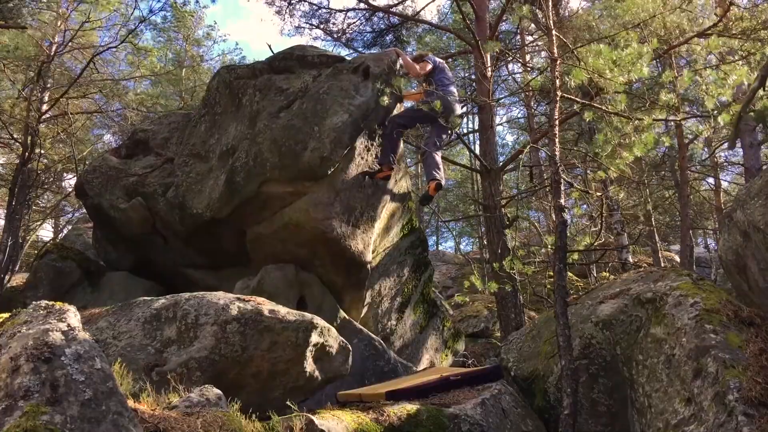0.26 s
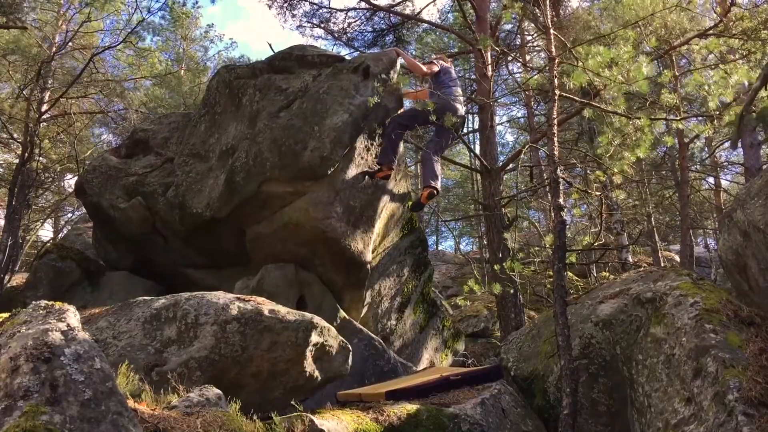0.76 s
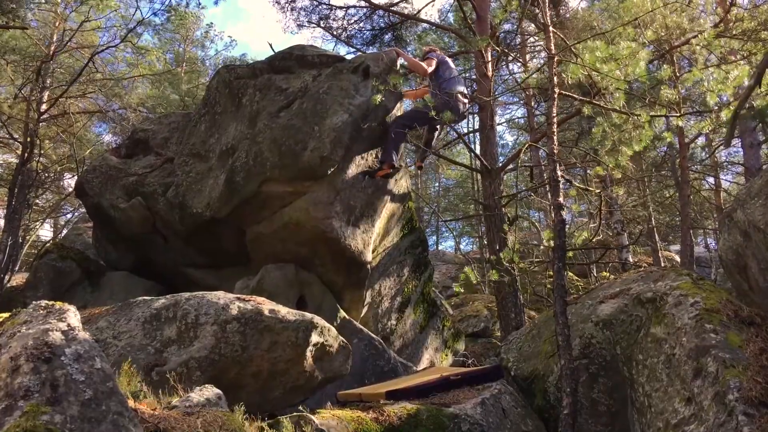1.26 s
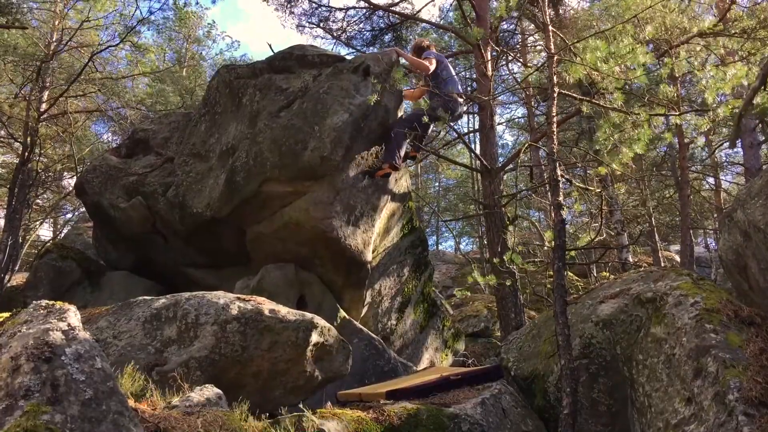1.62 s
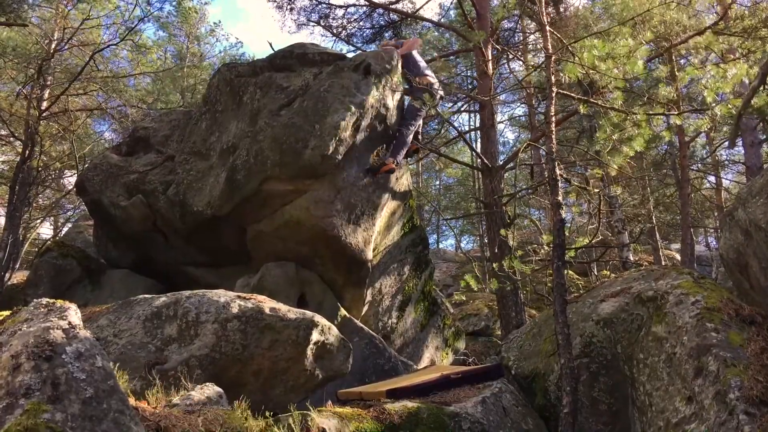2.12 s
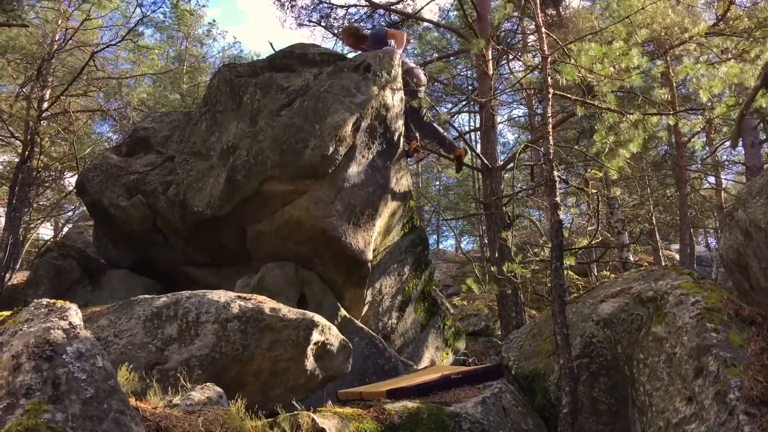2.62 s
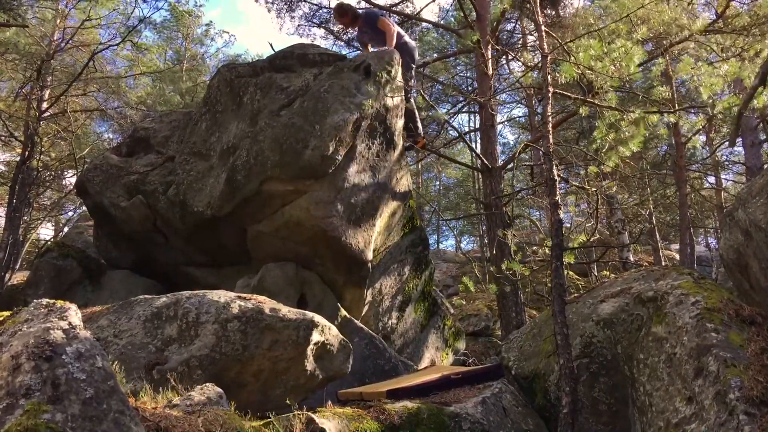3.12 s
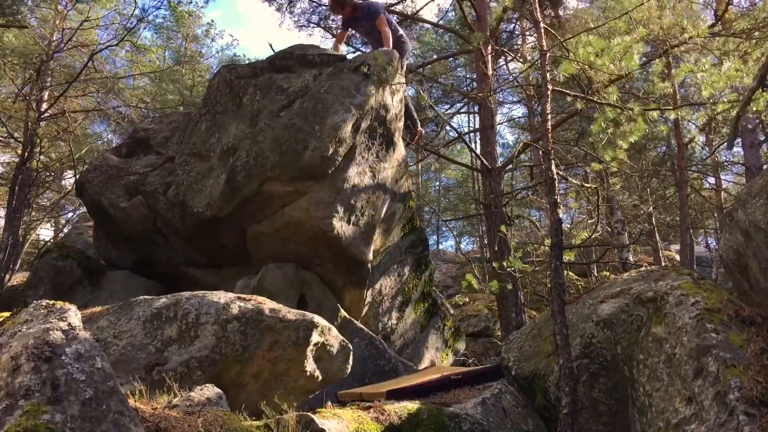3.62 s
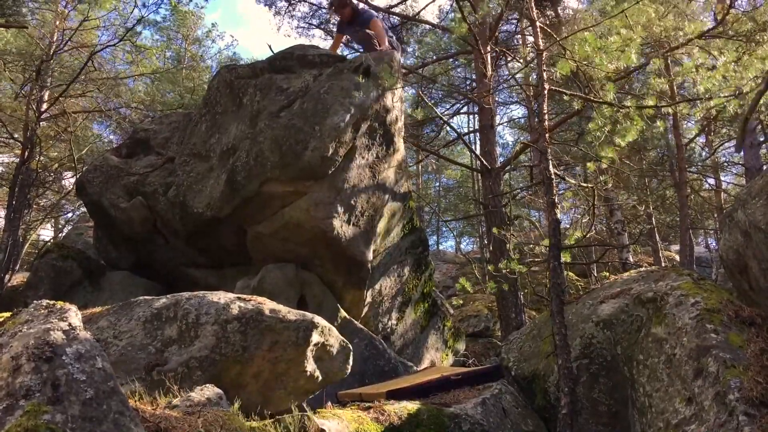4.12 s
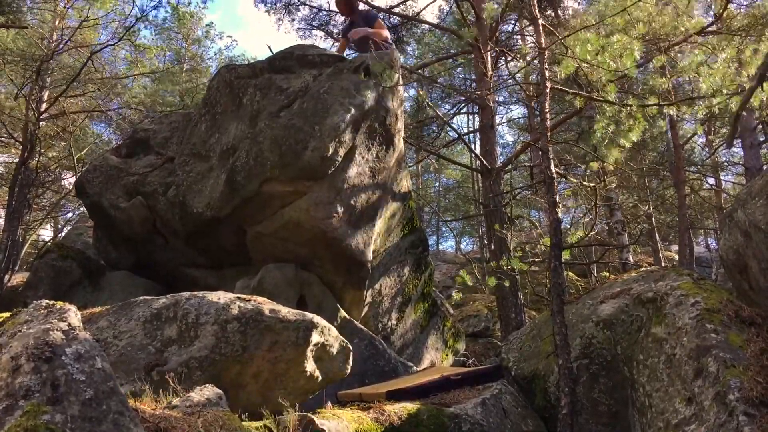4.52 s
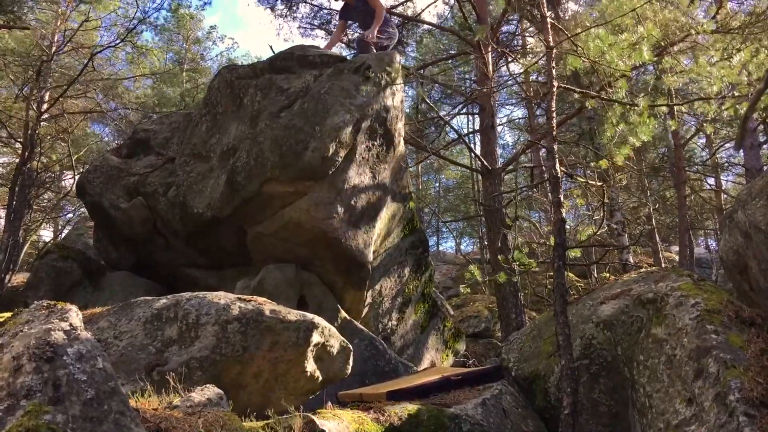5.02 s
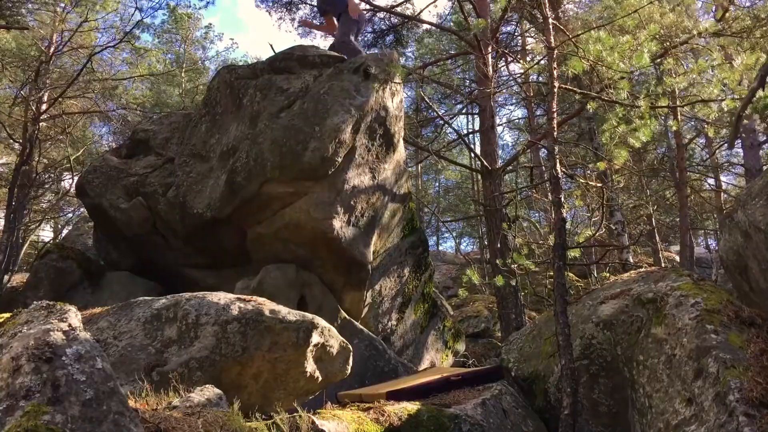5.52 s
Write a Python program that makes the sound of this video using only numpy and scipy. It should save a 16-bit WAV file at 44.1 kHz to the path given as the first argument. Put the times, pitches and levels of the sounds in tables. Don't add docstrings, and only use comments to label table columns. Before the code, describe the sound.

Wind strikes a bare microphone in a pine forest. Small scattered flutters and soft thuds come first, with a short lull, then from about two seconds the buffets grow dense and hard, easing near the end. Beneath lies a quiet, steady hiss of needles. The climber on the boulder is almost inaudible, only tiny gritty ticks and scuffs.

```python
import sys
import numpy as np
from scipy import signal
from scipy.io import wavfile
from scipy.ndimage import uniform_filter1d

SR = 44100
rng = np.random.default_rng(int(sys.argv[2]) if len(sys.argv) > 2 else 0)


def persist_wave(psi):
    counts = np.round(np.clip(psi, -1, 1) * 32767).astype(np.int16)
    wavfile.write(sys.argv[1], SR, np.atleast_2d(counts).T)


def gain_from_decibels(decibels):
    exponent = np.asarray(decibels, float) / 20
    return 10 ** exponent


N = 254016
TIME = np.arange(N) / SR
CALM_SWING_DB, CALM_SMALL_DB = -32.5, -48
MAX_PASSING_MS = 3.5


def level(x, rms_db):
    return x * gain_from_decibels(rms_db) / np.sqrt(np.mean(x ** 2))


def band(x, lo_hz, hi_hz, order=2):
    sos = signal.butter(order, [lo_hz, hi_hz], "bandpass", fs=SR, output="sos")
    return signal.sosfilt(sos, x)


def walk(rate_hz):
    k = int(SR / rate_hz)
    held = np.repeat(rng.standard_normal(1200), k)[:N]
    return 1.27 * uniform_filter1d(uniform_filter1d(held, k), k)


def add(out, start_s, grain):
    i = max(int(start_s * SR), 0)
    out[i:i + len(grain)] += grain[:N - i]


def swirl(t, width_s):
    return t / width_s * np.exp(.5 - (t / width_s) ** 2 / 2)


# start_s, length_s, small_turbulence_db, swings_over_small_db
GUST_TABLE = [(0.27, 0.021, -38, 6), (0.365, 0.051, -30, 3), (0.48, 0.027, -27, -3),
              (0.584, 0.13, -27, 1.5), (0.948, 0.047, -33, 6), (1.018, 0.098, -31, -9),
              (1.138, 0.033, -36, -15), (1.21, 0.21, -29, -7), (1.815, 0.032, -32, -9),
              (1.919, 0.17, -24, -10), (2.137, 0.28, -24.5, -3), (2.508, 0.25, -24, 6),
              (2.813, 0.077, -25, -10.5), (2.958, 0.018, -23, -2), (3.013, 0.23, -23, 5),
              (3.303, 0.2, -21.5, -8), (3.641, 0.24, -20.5, 3), (3.96, 0.089, -26, 4.5),
              (4.173, 0.052, -28, 8.5), (4.342, 0.092, -23, 1), (4.538, 0.15, -19, -18),
              (4.86, 0.093, -18.5, -0.5), (5.01, 0.05, -21.5, -3), (5.158, 0.094, -34, 6),
              (5.306, 0.038, -21.5, 2), (5.387, 0.17, -35, -2), (5.645, 0.02, -30, -22),
              (5.72, 0.034, -37.5, 17)]
# centre_s, half_length_s, drop_db
STALLS = [(0.14, 0.083, -2), (0.746, 0.015, -12), (0.84, 0.02, -12), (0.92, 0.011, -12),
          (1.462, 0.011, -14), (1.668, 0.023, -10), (1.793, 0.012, -4), (2.12, 0.021, -4.5),
          (2.28, 0.0097, -4), (2.48, 0.02, -4.5), (3.001, 0.0075, -20), (3.247, 0.019, -7),
          (3.57, 0.035, -9), (3.723, .015, -3), (4.14, 0.016, -8), (4.23, 0.012, -4), (4.313, 0.033, -1.5),
          (4.436, 0.017, -17), (4.755, 0.036, -4.5), (5.103, 0.031, -12), (5.29, 0.018, 0),
          (5.52, 0.0078, -12), (5.615, 0.026, -12)]


def flow(calm_db, gust_db, edge_stretch):
    rise_s, fall_s = 0.0072, 0.027
    steps = np.arange(0, N / SR, .002)
    start, length = np.transpose(GUST_TABLE)[:2, :, None]
    rise = np.minimum((steps - start) / rise_s, 0)
    fall = np.minimum((start + length - steps) / fall_s, 0)
    gusts = np.exp(-(rise ** 2 + fall ** 2) / edge_stretch ** 2)
    stall_db = sum(db * np.exp(-((steps - at) / half) ** 2) for at, half, db in STALLS)
    gain = (gain_from_decibels(calm_db) + gain_from_decibels(gust_db) @ gusts) * gain_from_decibels(stall_db)
    return np.interp(TIME, steps, gain)


def turbulence():
    swing_flutter_db, small_flutter_db = 2, 5
    swing_churn_db, small_churn_db = -12, -15.5
    small_db, over_db = np.transpose(GUST_TABLE)[2:]
    shared = walk(25.355)
    swing_flutter = gain_from_decibels(swing_flutter_db * (shared + walk(28)))
    small_flutter = gain_from_decibels(small_flutter_db * (.8 * shared + walk(50)))
    swings = level(band(rng.standard_normal(N), 25, 140) * swing_flutter, -5)
    small = level(band(rng.standard_normal(N), 125, 380, order=3) * small_flutter, -6)
    swing_gain = flow(CALM_SWING_DB, small_db + over_db + swing_churn_db, 1.93)
    small_gain = flow(CALM_SMALL_DB, small_db + small_churn_db, 0.56)
    return swing_gain * swings + small_gain * small


def fine_churn():
    churn_db, flutter_db = -28, 5
    fine = band(rng.standard_normal(N), 300, 620, order=3) * gain_from_decibels(flutter_db * walk(60))
    return flow(-70, np.transpose(GUST_TABLE)[2] + churn_db, 0.6) * level(fine, 0)


# time_s, level_db
PINE_RUSH = [(0.0, -54.5), (0.87, -55), (1.01, -55), (2.62, -56.5), (2.97, -56), (3.29, -56), (5.26, -55.5),
             (5.41, -56.5), (5.76, -55)]
# freq_hz, density_db
PINE_COLOUR = [(340, -16), (480, -3), (760, -4), (1000, -2.5), (1900, -7.5), (2600, -15), (3500, -23),
               (4900, -33), (6300, -34), (8000, -39), (9950, -39), (10450, -47), (10950, -41), (15600, -42)]


def pines():
    patch_s, patch_hz, flicker_db = .05, 100, 2
    colour_hz, colour_points_db = np.transpose(PINE_COLOUR)
    freq, frames, noise = signal.stft(rng.standard_normal(N), SR, nperseg=2048)
    patch_frames = max(int(patch_s / frames[1]), 1)
    patch_bins = max(int(patch_hz / freq[1]), 1)
    patches = rng.standard_normal(noise.shape)
    for _ in range(2):
        patches = uniform_filter1d(patches, patch_frames, axis=1, mode="wrap")
        patches = uniform_filter1d(patches, patch_bins, axis=0)
    colour_db = np.interp(np.log(np.maximum(freq, 1)), np.log(colour_hz), colour_points_db)
    gain_db = colour_db[:, None] + flicker_db * patches / patches.std()
    hiss = signal.istft(noise * gain_from_decibels(gain_db), SR, nperseg=2048)[1][:N]
    hiss /= band(hiss, 1500, 4000, order=4).std()
    return hiss * gain_from_decibels(np.interp(TIME, *np.transpose(PINE_RUSH)))


# centre_s, peak_db, passing_ms
SMALL_WHIRLS = [(0.285, -24.5, 0.72), (0.371, -23.5, 0.78), (0.592, -19.5, 0.7), (0.601, -27, 0.94),
                (0.612, -29, 0.92), (0.641, -27, 0.68), (1.035, -24.5, 0.9), (1.134, -24, 0.54),
                (1.164, -24, 0.75), (1.239, -31, 1), (1.382, -31, 0.52), (2.074, -32, 0.67),
                (2.193, -17.5, 0.88), (2.249, -25, 0.64), (2.256, -24, 0.8), (2.277, -20.5, 0.69),
                (2.343, -24, 0.6), (2.386, -21, 0.5), (2.547, -22.5, 1), (2.583, -27, 0.48),
                (2.599, -24.5, 0.57), (2.66, -26, 0.96), (2.678, -25, 1), (2.702, -17.5, 1),
                (2.725, -22.5, 0.85), (2.869, -22.5, 0.8), (2.888, -16.5, 0.52), (2.978, -20.5, 0.7),
                (3.087, -24.5, 0.7), (3.109, -26, 0.6), (3.127, -16, 0.67), (3.18, -19.5, 0.69),
                (3.366, -24.0, 0.38), (3.386, -23.0, 0.54), (3.393, -21.5, 0.75), (3.418, -19.0, 0.74),
                (3.429, -27, 0.72), (3.508, -25.0, 0.87), (3.542, -23, 0.88), (3.643, -26.0, 0.7),
                (3.654, -27.0, 0.38), (3.679, -22, 1), (3.739, -29, 0.65), (3.774, -28, 0.61),
                (3.805, -19, 0.4), (3.828, -23, 1), (4.019, -27, 0.8), (4.389, -20, 0.41),
                (4.55, -18, 0.92), (4.557, -23, 0.62), (4.59, -21, 0.42), (4.635, -17, 0.75),
                (4.647, -30, 0.87), (4.661, -20, 0.5), (4.899, -27, 0.54), (4.923, -24.5, 0.8),
                (4.949, -17.5, 0.42), (5.329, -24.0, 0.62), (5.672, -26.5, 0.56), (5.734, -31.5, 0.96)]
# centre_s, peak_db, passing_ms
SLOW_ROLLS = [(0.368, -19.5, 3), (0.58, -22, 2.8), (0.599, -19.5, 1.6), (0.612, -23, 0.86),
              (0.646, -26, 2.5), (1.321, -27, 1.8), (1.396, -22.5, 1.5), (1.408, -24, 2), (1.988, -20, 2.1),
              (2.085, -22, 2.5), (2.142, -22, 2.8), (2.165, -18, 1.14), (2.178, -22, 2.6),
              (2.237, -21.0, 1.2), (2.249, -19, 1.4), (2.322, -18, 1.3), (2.364, -31, 0.72),
              (2.398, -21.5, 4), (2.428, -25, 3.8), (2.509, -18, 1.64), (2.62, -20, 3.3),
              (2.633, -16.5, 2.6), (2.716, -14.5, 1.02), (2.727, -16.5, 3), (2.772, -18.5, 3),
              (2.926, -18.5, 3.1), (2.968, -21, 1.4), (3.085, -17.5, 1.8), (3.099, -16, 1.5),
              (3.134, -19, 1.1), (3.152, -18, 2.7), (3.193, -22.5, 1.9), (3.218, -17, 0.95),
              (3.489, -25, 1.5), (3.691, -24.0, 1.5), (3.764, -25, 1.1), (3.777, -18.5, 1.05),
              (3.803, -19.0, 0.91), (3.862, -25.5, 3.4), (3.995, -17.5, 1.3), (4.016, -26, 1.1),
              (4.031, -23, 1.4), (4.053, -25.5, 1.8), (4.217, -17.5, 2.2), (4.361, -21.5, 1.1),
              (4.392, -16.5, 3.2), (4.616, -17, 1.2), (4.655, -18, 1.1), (4.717, -24, 2.7),
              (4.839, -21.5, 2), (4.856, -25, 2.3), (4.917, -23, 3.3), (5.17, -18, 1.38),
              (5.195, -22.0, 2.6), (5.236, -19.5, 1.22), (5.29, -23.5, 3.2), (5.338, -19.5, 3.4),
              (5.439, -26, 1.3), (5.469, -16, 1.45), (5.733, -17, 1.27)]
# centre_s, peak_db, passing_ms
FAINT_WHIRLS = [(0.285, -33, 0.76), (0.294, -28.5, 0.57), (0.401, -26, 0.89), (0.641, -28, 0.66),
                (0.71, -28, 0.87), (1.029, -31, 0.8), (1.035, -27.0, 0.59), (1.043, -30, 0.94),
                (1.073, -28, 0.89), (1.081, -27, 1), (1.158, -27.5, 0.95), (1.164, -27, 0.86),
                (1.231, -26, 0.97), (1.303, -24, 0.76), (1.317, -27, 0.96), (1.382, -27.5, 0.74),
                (1.571, -32.5, 0.73), (1.617, -25.5, 0.65), (1.775, -28, 0.94), (1.816, -29, 0.57),
                (1.938, -35, 0.65), (2.249, -19, 1), (2.667, -27.5, 0.75), (2.869, -25.0, 0.7),
                (2.888, -18, 0.65), (3.053, -22.0, 0.62), (3.061, -28, 0.45), (3.087, -27.0, 0.65),
                (3.202, -26.5, 0.65), (3.438, -28.5, 0.47), (3.455, -30.0, 0.39), (3.476, -25, 0.76),
                (3.482, -23, 0.75), (3.516, -22.5, 0.8), (3.527, -27, 0.8), (3.671, -28.0, 1),
                (3.927, -21.5, 0.94), (4.052, -23, 0.94), (4.207, -23, 0.98), (4.265, -26.5, 1),
                (4.389, -26, 0.59), (4.401, -24, 0.98), (4.581, -21.5, 0.47), (4.671, -20, 0.5),
                (4.885, -30, 0.73), (4.923, -25, 0.8), (4.942, -18, 0.36), (4.949, -21, 0.74),
                (5.161, -34, 0.72), (5.383, -18, 0.57)]
# centre_s, peak_db, passing_ms
FAINT_ROLLS = [(0.055, -30, 1.9), (0.072, -30, 1.7), (0.403, -26, 2.5), (0.547, -26.5, 1.6),
               (0.646, -27, 2.6), (0.81, -28.5, 2.8), (0.942, -25, 1.9), (1.018, -27.0, 1.5),
               (1.04, -27, 3), (1.058, -26.0, 2), (1.084, -29, 1.2), (1.137, -28.0, 3.1),
               (1.267, -24.5, 1.2), (1.333, -24, 1.8), (1.363, -23.5, 2.8), (1.524, -31, 2.6),
               (1.59, -25, 2.5), (1.842, -26, 2.5), (1.988, -30, 1.7), (2.035, -27.5, 1.9),
               (2.156, -22, 1.7), (2.178, -26, 2.8), (2.203, -20, 3), (2.305, -19.5, 1.9),
               (2.339, -30, 1.7), (2.365, -28, 1.7), (2.661, -22.5, 1.5), (2.716, -20, 1.2),
               (2.738, -21, 1.2), (2.836, -26, 1.7), (2.891, -23, 1.1), (2.968, -20, 1.3),
               (3.109, -30, 1.8), (3.126, -13, 1.3), (3.321, -24.5, 1.1), (3.335, -27, 2.2),
               (3.39, -16.5, 1.8), (3.453, -24, 2.2), (3.483, -27, 0.85), (3.691, -28, 2.2),
               (3.746, -16, 2), (3.777, -20.5, 1.0), (3.837, -22, 3.7), (3.931, -23.5, 0.92),
               (3.944, -29.0, 3), (3.961, -26, 2.4), (4.031, -24, 2.2), (4.257, -26.5, 2.6),
               (4.361, -27, 0.93), (4.486, -23, 1.9), (4.575, -20, 2.8), (4.592, -22, 1.8),
               (4.839, -28, 1.7), (4.866, -23.0, 1.4), (4.894, -26.5, 1.4), (4.905, -26, 1.1),
               (5.184, -29.0, 3.1), (5.439, -24.5, 1.2), (5.544, -24, 3), (5.721, -32, 1.4)]


def rolls():
    out, t = np.zeros(N), np.arange(-600, 600) / SR
    groups = ((SMALL_WHIRLS, -1), (SLOW_ROLLS, -2), (FAINT_WHIRLS, -1), (FAINT_ROLLS, -1))
    for table, gain_db in groups:
        for centre_s, peak_db, passing_ms in table:
            sign = rng.choice([-1, 1])
            pulse = swirl(t, min(passing_ms, MAX_PASSING_MS) / 1000)
            add(out, centre_s + t[0], sign * gain_from_decibels(peak_db + gain_db) * pulse)
    return out


def shed():
    gap_s, under_gust_db, scatter_db, passing_ms = .02, -17, 5.5, 1.0
    gap_chance, level_chance, size_chance = rng.standard_normal((3, 320))
    centre_s = np.cumsum(gap_s * np.exp(.45 * gap_chance))
    gust = flow(CALM_SMALL_DB + 10.5, np.transpose(GUST_TABLE)[2], 0.74)
    gust_db = 20 * np.log10(np.interp(centre_s, TIME, gust))
    peak_db = gust_db + under_gust_db + scatter_db * np.tanh(level_chance)
    sizes_ms = passing_ms * np.exp(0.21 * np.tanh(size_chance))
    return [row for row in zip(centre_s, peak_db, sizes_ms) if row[0] < TIME[-1]]


# centre_s, small_db, small_passing_ms, large_db, large_passing_ms
BUFFET_PAIRS = [(0.301, -25, 0.62, -19.5, 2.9), (0.485, -22.5, 0.52, -22, 1.66),
                (0.624, -20.5, 1, -15.5, 2.2), (0.966, -22, 0.92, -25, 2), (1.302, -28.5, 0.45, -23, 1.76),
                (1.371, -22.5, 0.63, -33, 1.6), (1.972, -14, 0.98, -17, 1.86), (2.2, -18, 0.56, -24, 3.7),
                (2.376, -10, 0.45, -11.5, 1.5), (2.577, -15, 0.3, -9.5, 1.35),
                (2.672, -27, 0.33, -13.5, 1.8), (2.897, -16.5, 0.44, -18.5, 1.16),
                (3.066, -18, 0.49, -16, 1.33), (3.119, -18, 0.5, -22, 2), (3.166, -16.5, 0.5, -15.5, 2.6),
                (3.4, -18.5, 0.6, -17, 1.42), (3.67, -27.5, 0.32, -16.5, 1.93),
                (3.815, -14.5, 0.38, -12, 1.13), (3.846, -13.5, 0.46, -22, 1.03),
                (4.184, -14.5, 0.67, -15.5, 2.4), (4.582, -20, 0.55, -19.5, 0.91),
                (4.628, -9, 0.49, -11.5, 1.04), (4.9395, -15, 0.36, -13.5, 1.23),
                (5.388, -16, 0.72, -13.5, 1.5)]
# centre_s, peak_db, passing_ms
LONE_THUMPS = [(0.796, -30.5, 0.87), (0.89, -31.5, 2), (1.033, -30, 0.73), (1.215, -21.5, 1.23),
               (1.236, -23, 1.8), (1.34, -20, 0.96), (1.575, -31.5, 1.67), (1.619, -28.5, 1.7),
               (1.726, -25.5, 1.5), (1.769, -25.5, 2.24), (1.869, -21.5, 1.75), (2.006, -23.5, 0.92),
               (2.072, -21.5, 1.5), (2.295, -23.5, 1.3), (2.547, -22, 1.84), (2.703, -18.5, 2.4),
               (2.821, -19.5, 0.88), (2.859, -19.5, 2), (3.052, -21, 1.37), (3.207, -21.5, 1.15),
               (3.334, -28.5, 1.9), (3.417, -20.5, 1.1), (3.747, -18, 1.47), (4.559, -19.5, 2.1),
               (4.877, -33, 1.2), (5.216, -21, 2.3), (5.326, -24.5, 1.38), (5.487, -23, 2.4),
               (5.599, -24, 2.2), (5.675, -21, 1.28)]
# centre_s, peak_db, passing_ms
LONE_FLICKS = [(0.355, -23, 0.69), (0.58, -26, 0.59), (0.654, -23, 0.84), (0.688, -22, 0.78),
               (1.152, -24, 0.43), (1.173, -28.5, 0.54), (1.407, -21, 0.72), (1.936, -29, 0.75),
               (2.163, -17, 0.66), (2.365, -18.5, 0.39), (2.63, -28.5, 0.46), (2.717, -15.5, 0.53),
               (2.775, -24, 0.31), (2.878, -24, 0.5), (2.97, -20, 0.5), (3.224, -21.5, 0.65),
               (3.482, -29, 0.56), (3.516, -30, 0.45), (3.531, -20.5, 0.48), (3.782, -23.5, 0.53),
               (3.895, -24.5, 0.63), (3.93, -27, 0.92), (4.367, -19.5, 0.61), (4.38, -21, 0.39),
               (4.654, -18.5, 0.31), (4.67, -14, 0.49), (4.706, -30, 0.88), (5.014, -23.5, 0.57),
               (5.026, -23, 0.57), (5.467, -20.5, 0.63)]


def eddies():
    escort_db, escort_ms = -11.5, 0.33
    wake_db, wake_ms = -13.5, 2.9
    out, t = np.zeros(N), np.arange(-900, 1300) / SR
    flicks = [(s, db, ms, db + wake_db, wake_ms) for s, db, ms in LONE_FLICKS]
    thumps = [(s, db + escort_db, escort_ms, db, ms) for s, db, ms in LONE_THUMPS + shed()]
    for centre_s, small_db, small_ms, large_db, large_ms in BUFFET_PAIRS + flicks + thumps:
        small_s, large_s = np.minimum([small_ms, large_ms], MAX_PASSING_MS) / 1000
        noise = rng.standard_normal(len(t))
        size_hz = 1 / (2 * np.pi * small_s)
        flutter = band(noise, .5 * size_hz, size_hz)
        flutter *= np.exp(-(t / 0.0098) ** 2) / flutter.std()
        small = gain_from_decibels(small_db) * (swirl(t, small_s) + 0.28 * flutter)
        large = gain_from_decibels(large_db + 3.5) * swirl(t - 0.34 * large_s, large_s)
        add(out, centre_s + t[0], np.sign(noise[0]) * (small - large))
    return out


# centre_s, peak_db, passing_ms
SNAP_TABLE = [(1.970, -20, 0.54), (2.5755, -19, 0.17), (4.876, -31, .38), (3.683, -30, .25),
              (3.436, -30, .25), (2.820, -25, 0.45), (3.164, -23, 0.36), (5.464, -21, 0.5),
              (3.671, -29, 0.4), (3.746, -22, 0.36), (3.846, -24, 1), (4.187, -47, 0.42),
              (4.618, -19, 0.46), (4.654, -14, 0.36), (4.939, -28.5, 0.18), (5.389, -20, 0.4),
              (4.4, -27, 0.34), (5.166, -33, .22), (3.2, -31.5, 0.42)]


def snaps():
    out, t = np.zeros(N), np.arange(-200, 200) / SR
    for centre_s, peak_db, passing_ms in SNAP_TABLE:
        add(out, centre_s + t[0], gain_from_decibels(peak_db) * swirl(t, passing_ms / 1000))
    return out


# start_s, peak_db, pitch_hz, t60_s
GRIT_TICKS = [(2.0188, -61, 13550, 0.015), (2.033, -62, 14000, .015), (2.0961, -71, 11500, 0.039),
              (2.1784, -63, 13840, 0.024), (2.671, -50, 13800, 0.014), (2.6908, -57, 13500, 0.011),
              (2.8948, -53, 13340, 0.013), (3.0484, -61, 13500, 0.034), (3.3722, -57, 13900, 0.026),
              (3.8224, -61, 12900, 0.03), (4.309, -66.5, 13300, 0.038), (4.3625, -65, 13800, 0.03),
              (4.4443, -62, 13050, 0.033), (4.939, -59, 9400, .04), (2.019, -64, 6200, .02),
              (3.048, -64, 9000, .03), (3.373, -64, 10000, .03), (5.2565, -62, 12800, 0.03),
              (5.4879, -66, 12000, 0.03), (5.7314, -65, 14100, 0.03)]
# start_s, peak_db, pitch_hz, t60_s
GRIT_CHINKS = [
    (2.1864, -65, 5330, 0.08),
    (3.092, -64, 5330, 0.0396),
]
# centre_s, length_s, level_db
SOLE_SCUFFS = [
    (2.109, 0.12, -81),
    (2.202, 0.034, -83),
    (2.704, 0.07, -74),
    (2.92, 0.04, -78),
    (3.072, 0.055, -73),
    (4.387, 0.13, -78),
]


def shoes():
    out, t = np.zeros(N), np.arange(3000) / SR
    for table, spread in ((GRIT_TICKS, .09), (GRIT_CHINKS, .025)):
        for start_s, peak_db, pitch_hz, t60_s in table:
            grit = band(rng.standard_normal(len(t)), pitch_hz * (1 - spread), pitch_hz * (1 + spread))
            envelope = np.minimum(t / .0008, 1) * gain_from_decibels(-60 * t / t60_s)
            add(out, start_s, gain_from_decibels(peak_db - 5) * grit / grit.std() * envelope)
    hiss = level(band(rng.standard_normal(N), 4800, 14000) * gain_from_decibels(2.2 * walk(200)), 0)
    swell = sum(gain_from_decibels(db) * np.exp(-((TIME - s) / length) ** 2 * 2) for s, length, db in SOLE_SCUFFS)
    return out + hiss * swell


def scene():
    capsule_hz = 2500
    wind = turbulence() + fine_churn() + rolls() + eddies() + snaps()
    membrane = signal.butter(4, capsule_hz, fs=SR, output="sos")
    forest = pines() + shoes()
    return (signal.sosfilt(membrane, wind) + forest)[None]


# start_s, length_s
TOP_DROPOUTS = [(1.965, .022), (2.19, .011), (2.38, .01), (2.565, .012), (3.16, .02), (3.351, .016),
                (3.845, .02), (4.548, .126), (4.931, .02), (5.383, .015), (5.447, .036)]


def drop_top(x):
    lost = sum((TIME > s) * (TIME < s + length) for s, length in TOP_DROPOUTS) * .85
    lost = uniform_filter1d(lost, size=64)
    top = signal.sosfiltfilt(signal.butter(12, 12700, "high", fs=SR, output="sos"), x)
    return x - lost * top


def top_cut(x):
    return signal.sosfilt(signal.butter(12, 15700, fs=SR, output="sos"), x)


def record(dry):
    bass_cut_hz, lag_hz, lag_damping = 50, 100, .7
    cut = signal.sosfilt(signal.butter(4, bass_cut_hz, "high", fs=SR, output="sos"), dry)
    pole = np.exp(2 * np.pi * lag_hz / SR * (-lag_damping + 1j * np.sqrt(1 - lag_damping ** 2)))
    ring = np.poly([pole, pole.conjugate()]).real
    late = signal.lfilter(ring[::-1], ring, cut)
    late *= np.minimum((TIME[-1] - TIME) / .004, 1)
    edge = signal.butter(20, 15480, fs=SR, output="sos")
    return top_cut(signal.sosfilt(edge, drop_top(late)))


dry = scene()
out = record(dry)
persist_wave(out)
```